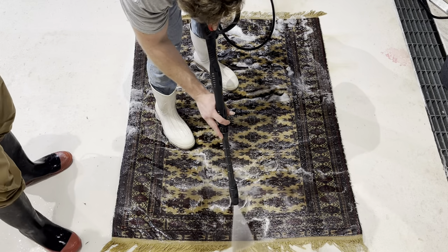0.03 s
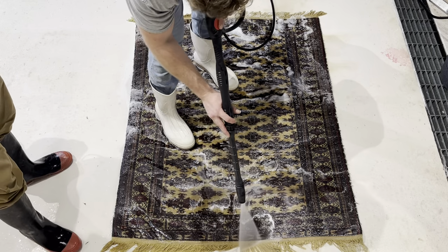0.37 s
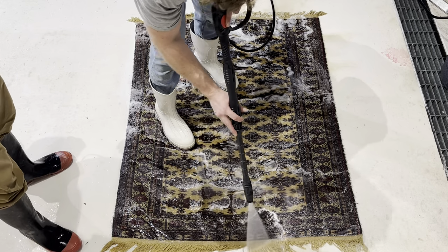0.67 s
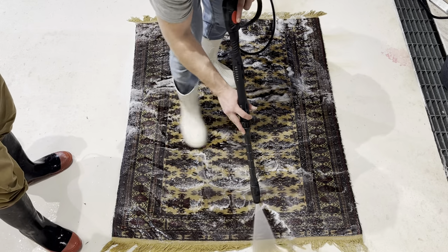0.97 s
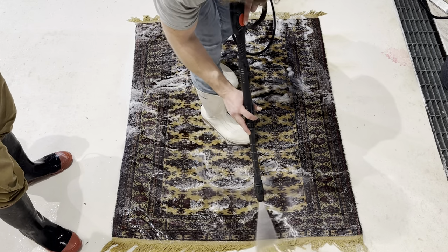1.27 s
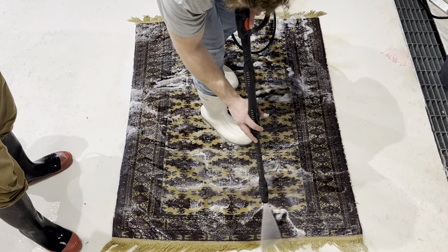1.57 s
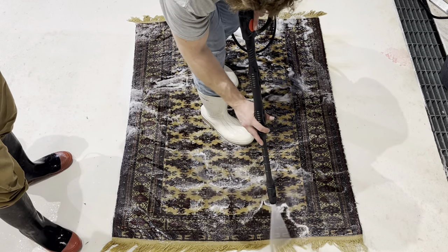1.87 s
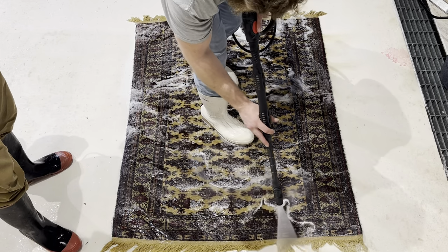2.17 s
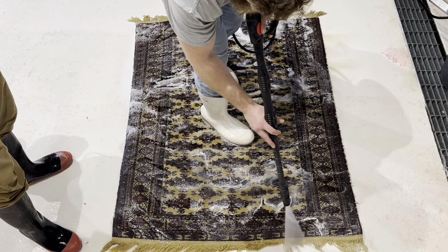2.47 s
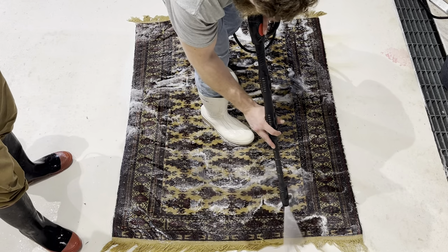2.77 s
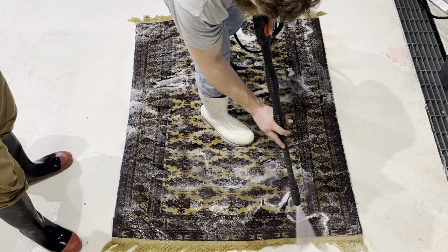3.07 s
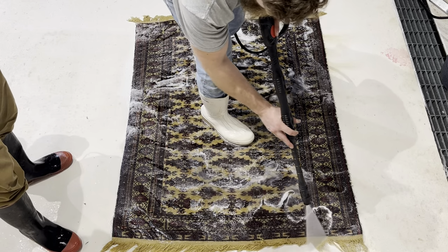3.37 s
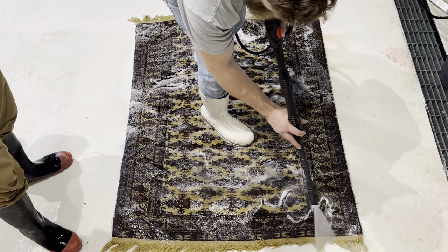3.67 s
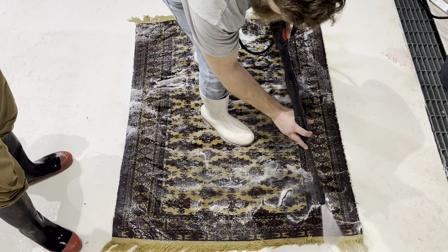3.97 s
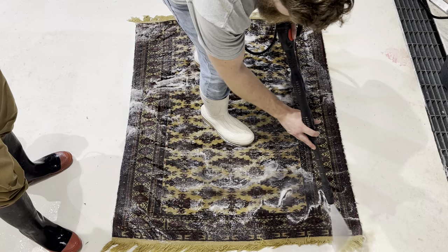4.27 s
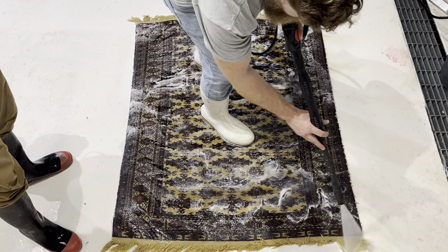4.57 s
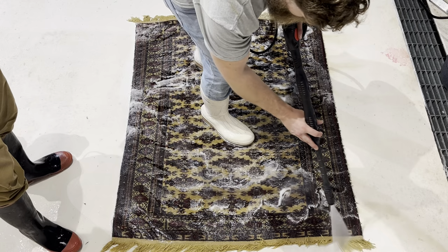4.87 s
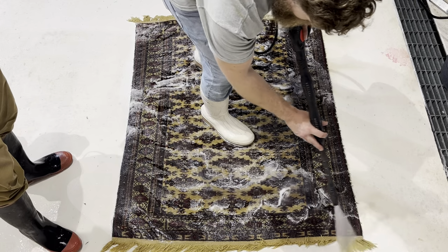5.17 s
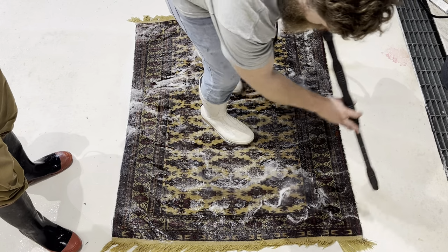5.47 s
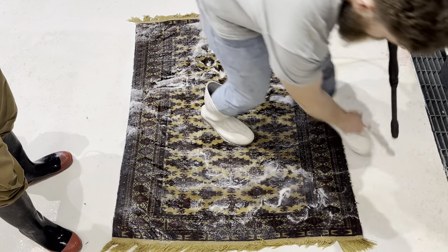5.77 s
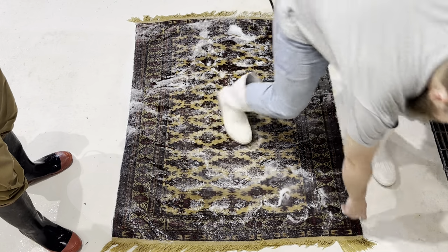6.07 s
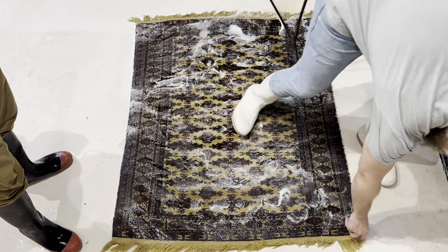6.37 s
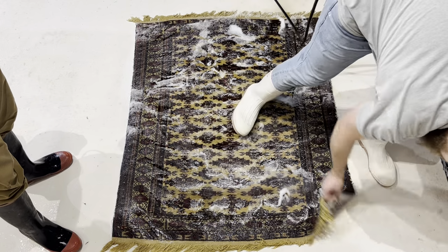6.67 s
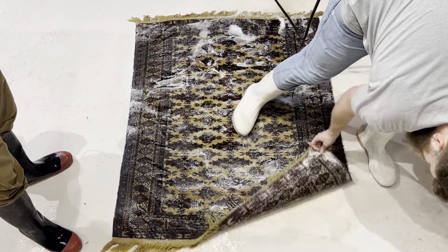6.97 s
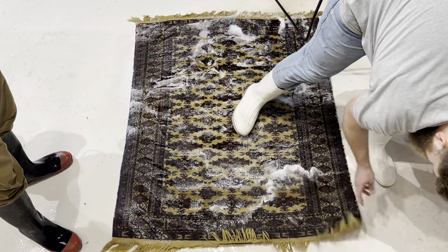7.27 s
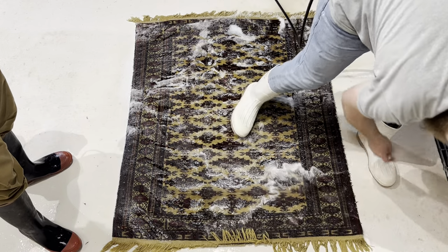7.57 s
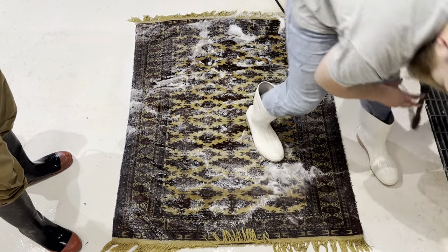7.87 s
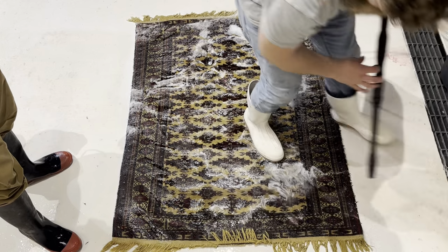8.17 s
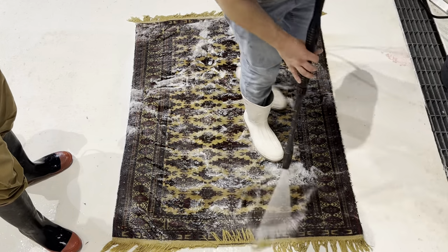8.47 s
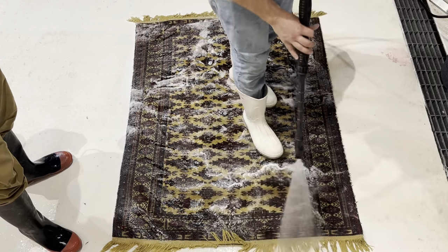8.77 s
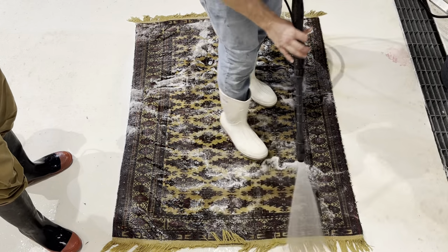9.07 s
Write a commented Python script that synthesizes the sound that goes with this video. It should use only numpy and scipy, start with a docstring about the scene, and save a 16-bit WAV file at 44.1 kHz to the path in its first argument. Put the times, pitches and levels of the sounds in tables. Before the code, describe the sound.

A pressure washer hisses on a wet rug, stops for boot thuds and a wet slap, then spits, squeals and sprays again.

```python
"""Pressure washer rinsing a soapy rug on a concrete workshop floor: droplets drum on the pile, the
water fan hisses, the piston pump drones and its valves rattle the housing. A rubber boot squeaks.
The trigger is let go, the gun snaps shut and the pump coasts down; boots thud, a corner of the wet
rug is peeled up and slaps back. On the next pull the lance spits, a valve squeals and the jet builds."""
import sys
import numpy as np
from scipy import signal
from scipy.fft import rfft, irfft, next_fast_len
from scipy.io import wavfile
from scipy.ndimage import map_coordinates

SR = 44100
rng = np.random.default_rng(int(sys.argv[2]) if len(sys.argv) > 2 else 0)


def wav_record(signal):
    """Record a signal, one row per channel, as 16-bit PCM in the file named by sys.argv[1]."""
    frames = np.transpose(np.atleast_2d(signal))
    bounded = np.clip(frames, -1, 1)
    # unit amplitude maps onto the largest positive 16-bit level
    quanta = np.round(bounded * 32767).astype(np.int16)
    wavfile.write(sys.argv[1], SR, quanta)


N = 406602
TIME = np.arange(N) / SR
FFT_SIZE = next_fast_len(N + SR)
BINS_HZ = np.maximum(np.fft.rfftfreq(FFT_SIZE, 1 / SR), 1)
RELEASE_S, PULL_S = 5.44, 8.311  # trigger
PRESSURE_RISE_S = 0.035

# pump housing resonances: f/Hz, width/Hz, level/dB
HOUSING_MODES = [(585, 24, 2), (740, 110, -6), (1120, 26, -4), (1245, 28, -3.5), (1430, 70, -8),
                 (1630, 50, 1.5), (1800, 120, -11), (2050, 60, -12), (2480, 110, -10), (2592, 48, -5.5),
                 (2700, 90, -15), (3760, 90, -14), (4130, 70, -15), (4700, 400, -20), (5770, 70, -23)]
# stereo port pair: f/Hz, coherence, L-R/dB, left lead/rad
STEREO_PORTS = [(100, .9, -1, .2), (300, .8, -2.5, -.3), (600, .5, -1.5, -1.2), (900, .3, -2, -1),
                (1550, .33, -2.5, -1.2), (1800, .82, 1.5, 0), (2300, .92, 1, .05), (3000, .78, .3, .2),
                (4600, .5, 4.3, .5), (5200, .25, 4, -.1), (5900, .43, 2.5, -1.5), (7100, .5, 0, -1.8),
                (8300, .92, 0, -3.14), (10000, .8, -.6, -4.7), (11100, .96, 0, -6.2), (12500, .99, 0, -6.3),
                (13800, .72, 0, -7.85), (15200, .99, 0, -9.4)]


def from_db(db):
    """Decibels to gain."""
    return 10 ** (np.asarray(db) / 20)


def unit_rms(x):
    """Scale to rms 1."""
    return x / np.sqrt(np.mean(x ** 2) + 1e-20)


def in_time(rows):
    """Table columns interpolated per sample."""
    times_s, *columns = np.transpose(rows)
    return [np.interp(TIME, times_s, c) for c in columns]


def in_frequency(rows):
    """Table columns interpolated per bin, on log f."""
    hz, *columns = np.transpose(rows)
    return [np.interp(np.log(BINS_HZ), np.log(hz), c) for c in columns]


def filtered(x, response):
    """Apply a frequency response."""
    return irfft(rfft(x, FFT_SIZE) * response, FFT_SIZE)[..., :N]


def coloured(x, spectrum):
    """Shape x by a spectrum table; rms 1."""
    return unit_rms(filtered(x, from_db(in_frequency(spectrum)[0])))


def resonated(x, hz, width_hz):
    """One resonance; rms 1."""
    return unit_rms(signal.lfilter(*signal.iirpeak(hz, hz / width_hz, fs=SR), x))


def white():
    """Two independent noises: the ports' shared and differing parts."""
    return rng.standard_normal((2, N))


def drift(knots_per_s):
    """Smooth random curve; rms 1."""
    knots = rng.standard_normal(4096)
    return unit_rms(map_coordinates(knots, [TIME * knots_per_s], order=2, mode="wrap"))


def drops(per_s, spread_db):
    """Random impacts of uneven size; rms 1."""
    sizes = from_db(spread_db * np.minimum(rng.exponential(1, N), 4))
    return unit_rms(white() * sizes * (rng.random(N) < per_s / SR))


def phase_of(hz):
    """Running phase/rad of a varying frequency."""
    return 2 * np.pi * np.cumsum(hz) / SR


def since(t_s):
    """Seconds after t_s; zero before."""
    return np.maximum(TIME - t_s, 0)


def blow(t_s, t60_s, rise_s):
    """Impact envelope: quick rise, exponential fall."""
    age_s = since(t_s)
    return (1 - np.exp(-age_s / rise_s)) * np.exp(-np.minimum(np.log(1000) * age_s / t60_s, 40))


def swell(middle_s, length_s):
    """Half-cosine envelope."""
    return np.cos(np.pi * np.clip((TIME - middle_s) / length_s, -.5, .5))


def build_up(delay_s, width_s):
    """S-curve, 0 to 1, after the pull."""
    return (TIME > PULL_S) * (1 + np.tanh((TIME - PULL_S - delay_s) / (2 * width_s))) / 2


def reflected(x):
    """Echoes off floor, body and ceiling comb the sound, swaying as lance and body move."""
    # delay/s, gain, sway/s
    echoes = [(.00082, .06, .00008), (.00122, -.1, .00012), (.0016, .1, .0001), (.0031, .11, .0002),
              (.0053, -.12, .0002), (.00815, .11, .00015), (.0088, -.11, .00012), (.01033, .12, .00005),
              (.01047, -.1, .00005), (.0131, -.11, .0002), (.0166, .12, .0002), (.0203, .11, .0002)]
    out, samples = x, np.arange(N)
    for delay_s, gain, sway_s in echoes:
        lag = np.round((delay_s + sway_s * drift(1.2)) * SR).astype(int)
        out = out + gain * x[:, np.maximum(samples - lag, 0)]
    return out


def sweep_db():
    """Hiss and mist levels as the lance sweeps."""
    # per burst: t/s, hiss/dB, mist/dB
    first_burst = [(0.1, -25.5, -31), (0.2, -25.5, -30.5), (1.0, -26, -32.5), (1.13, -27, -31),
                   (1.19, -25.5, -34), (1.42, -25.5, -31), (3.39, -26.5, -31.5), (4.17, -27.5, -29.5),
                   (5.3, -27.5, -32)]
    second_burst = [(8.6, -24, -27.5), (8.666, -23, -29.5), (9.2, -25, -30.5)]
    return in_time(np.vstack([first_burst, second_burst]))


def jet_level(spit_db, fall_db_per_s):
    """Steady, dying on release; on the pull the charged hose spits before pump pressure arrives."""
    spit_rise_s, spit_length_s = 0.011, 0.065
    first_burst = from_db(-fall_db_per_s * since(RELEASE_S))
    age_s = since(PULL_S)
    spit = from_db(spit_db) * (1 - np.exp(-age_s / spit_rise_s)) * np.exp(-(age_s / spit_length_s) ** 2)
    return first_burst + np.hypot(spit, build_up(delay_s=0.16, width_s=PRESSURE_RISE_S))


def jet():
    """Droplets drum on the pile, the unevenly breaking fan hisses, its mist adds the top."""
    # spectra: f/Hz, level/dB
    drumming_spectrum = [(25, -55), (45, -35), (70, -23), (150, -8.5), (280, -5.5), (400, -1.5),
                         (500, -2.5), (620, -2), (900, -2.5), (1250, -3), (1600, -3), (2000, -17.5),
                         (3000, -17.5)]
    hiss_spectrum = [(1100, -47.5), (1800, -1), (2600, 0), (3200, 1), (5200, 0), (6500, -0.5), (7500, -2.5),
                     (8500, -7.5), (10000, -5.5), (13000, -59)]
    mist_spectrum = [(7500, -6), (9500, 1.5), (11200, 5.5), (13000, 1.5), (14500, 1), (15700, -20.5)]
    # hiss top against its body along the sweep: t/s, level/dB
    brightness = [(.2, 1), (.9, -0.7), (1.25, 0.7), (1.85, -0.2), (2.45, -2), (3.45, -2), (4.2, 0.5),
                  (5.3, -0.6)]
    split_hz, dulling_db_per_s = 4500, 150
    hiss_db, mist_db = sweep_db()
    flutter = from_db(.2 * drift(25) + .25 * drift(150))
    nearer_db = 2.5 * (TIME > PULL_S)  # second burst lands closer
    drumming = from_db(-28 + nearer_db) * coloured(white(), drumming_spectrum)
    drumming *= jet_level(spit_db=-5.5, fall_db_per_s=117)
    hiss = from_db(hiss_db - 0.052) * coloured(white(), hiss_spectrum)
    hiss *= jet_level(spit_db=-7, fall_db_per_s=89)
    body = filtered(hiss, 1 / (1 + (BINS_HZ / split_hz) ** 2))
    collapse_db = dulling_db_per_s * since(RELEASE_S) * (TIME < PULL_S)
    hiss = body + (hiss - body) * from_db(in_time(brightness)[0] - collapse_db)
    mist = from_db(mist_db) * coloured(drops(per_s=33000, spread_db=1.5), mist_spectrum)
    mist *= jet_level(spit_db=-4.5, fall_db_per_s=380)
    return reflected(flutter * (drumming + hiss + mist + surges()))


def motor():
    """Speed (share of full) and load gain: coasts down on release, spins up on the pull."""
    cut_out_s, coast_s, unload_s, unload_db_per_s = RELEASE_S + .04, .6, RELEASE_S + .11, 170
    start_slip, spin_up_s, harder_db = .37, .16, 3.5
    coasting = np.exp(-since(cut_out_s) / coast_s)
    starting = 1 - start_slip * np.exp(-(since(PULL_S) / spin_up_s) ** 2)
    first_load = from_db(-unload_db_per_s * since(unload_s))
    second_load = from_db(harder_db) * build_up(delay_s=0.16, width_s=0.02)
    return np.where(TIME < PULL_S, coasting, starting), first_load + second_load


def pump():
    """Pistons beat at shaft orders over the motor's magnetic hum; off speed it shudders and growls."""
    # piston lines: shaft order, level/dB, L-R/dB
    orders = [(2, -62, -8), (3, -48.5, 1), (5, -57, 3), (6, -44, -6), (7, -44, -4), (8, -49, -6),
              (9, -39, -3), (10, -48, 5), (11, -50, -9), (12, -46, -2), (13, -49, -6), (14, -50, 4),
              (16, -51, -1), (20, -40, 0), (21, -40.5, 1), (22, -49, -1), (23, -44, 3), (25, -50, -6),
              (26, -48, -9), (30, -52, 5), (39, -52, -6), (43, -52, -6), (45, -49, 0), (63, -51, 0),
              (66, -52, 0), (82, -52, 0), (93, -48, 0), (95, -48, 0)]
    # magnetic hum: harmonic, level/dB
    hum_lines = [(1, -40.5), (2, -50), (3, -52), (5, -48)]
    # labouring motor: middle/s, length/s, level/dB
    growls = [(5.525, 0.12, -43), (8.437, 0.075, -39)]
    shaft_hz, hum_hz, shudder, judder_db = 28.02, 119.9, 0.302, 2.5
    inrush_s, inrush_db = 0.16, -43
    speed, load = motor()
    slip = 1 - speed
    turns = np.cumsum(shaft_hz * speed * (1 + 0.000454 * drift(4) + shudder * slip * drift(60))) / SR
    port_hz, _, _, port_lead_rad = np.transpose(STEREO_PORTS)
    side = np.array([[.5], [-.5]])
    pistons = np.zeros((2, N))
    for order, db, pan_db in orders:
        lead_rad = np.interp(order * shaft_hz, port_hz, port_lead_rad)
        phase = 2 * np.pi * (order * turns + rng.random()) + side * lead_rad
        slack_db = -1.9 * order * slip  # slow strokes are softer: high lines go first
        pistons += from_db(db - 1.5 + slack_db + 0.87 * drift(4.4) + side * pan_db) * np.sin(phase)
    hum_phase = 2 * np.pi * turns * hum_hz / shaft_hz
    hum = sum(from_db(db) * np.sin(harmonic * hum_phase + .3 * side) for harmonic, db in hum_lines)
    stroke_phase = 2 * np.pi * 3 * turns
    growl = sum(from_db(db) * swell(t_s, length_s) for t_s, length_s, db in growls)
    growl *= np.sin(stroke_phase) + from_db(-7.5) * np.sin(2 * stroke_phase)
    buzz_phase = 2 * np.pi * hum_hz * TIME  # starting current
    inrush = from_db(inrush_db) * np.sqrt(swell(PULL_S + inrush_s / 2, inrush_s))
    inrush *= np.sin(buzz_phase) + from_db(-5) * np.sin(2 * buzz_phase)
    judder = from_db(judder_db * np.minimum(10 * slip, 1) * drift(70))
    hum *= from_db(0.5 * drift(3.3))
    return np.sqrt(2) * judder * (load * (pistons + hum) + growl + inrush)


def valve_flow():
    """Flow gain: follows the hiss, bleeds on after release until the valves seat, returns on the pull."""
    follow, bleed_db_per_s, seat_s, seated_db_per_s = 0.82, 17, 6.3, 65
    hiss_db = sweep_db()[0]
    ebb_db = bleed_db_per_s * since(RELEASE_S) + seated_db_per_s * since(seat_s)
    first_burst = from_db(follow * (hiss_db - hiss_db.mean()) - ebb_db)
    return from_db(-40.5) * (first_burst + build_up(delay_s=0.12, width_s=PRESSURE_RISE_S))


def valves():
    """Water forced through the chattering valves rushes and rattles the housing."""
    # f/Hz, level/dB
    rush_spectrum = [(100, -25.5), (500, -5.5), (1200, 13), (2800, 6.5), (5000, 0), (8000, -19),
                     (15000, -37.5)]
    housing_top_hz, chatter_db = 6000, 0.8
    rush = from_db(-2.5) * coloured(white(), rush_spectrum)
    rattle = filtered(drops(per_s=2500, spread_db=0.5), 1 / (1 + (BINS_HZ / housing_top_hz) ** 4))
    for k, (hz, width_hz, db) in enumerate(HOUSING_MODES):
        rush += (-1) ** k * from_db(db - 5.5 + 1.2 * drift(28)) * resonated(rattle, hz, width_hz)
    chatter = from_db(chatter_db * drift(110))
    return reflected(valve_flow() * chatter * rush)


def room_rumble():
    """Low, nearly steady room noise."""
    # f/Hz, level/dB
    rumble_spectrum = [(25, -28.5), (60, -4.5), (110, -0.5), (165, -4), (195, -6), (218, 6), (245, -5.5),
                       (330, -10), (600, -10), (1400, -15), (2200, -27), (4500, -29), (8000, -37),
                       (15000, -43.5)]
    return from_db(-51.0 + 0.14 * drift(11.0)) * coloured(white(), rumble_spectrum)


def boot_squeaks():
    """Rubber sticks and slips on wet pile: wavering, sagging pitch with a weak octave."""
    # middle/s, length/s, f/Hz, level/dB
    squeaks = [(1.01, .15, 480, -34), (1.083, .085, 403, -30), (1.154, .036, 382, -20.5),
               (1.205, .072, 384, -34)]
    sag_hz_per_s = 120
    waver = 1 + .025 * drift(120)
    out = 0
    for t_s, length_s, hz, db in squeaks:
        phase = phase_of((hz - sag_hz_per_s * (TIME - t_s)) * waver)
        out += from_db(db) * swell(t_s, length_s) * (np.sin(phase) + from_db(-14.5) * np.sin(2 * phase))
    return np.sqrt(2) * out * [[1], [.4]]


def surges():
    """The fan digs into puddles and the rug's fringe: short midrange gushes."""
    # middle/s, length/s, f/Hz, level/dB
    gushes = [(1.26, 0.15, 1090, -34), (1.34, .16, 1760, -35), (2.06, .2, 1600, -34.5),
              (4.05, .5, 1000, -39), (4.66, 0.11, 990, -34), (4.85, 0.23, 1100, -36)]
    width_hz = 850
    spray = drops(per_s=9000, spread_db=0.5)
    out = 0
    for t_s, length_s, hz, db in gushes:
        band = resonated(resonated(spray, hz, width_hz), hz, width_hz)
        out += from_db(db) * swell(t_s, length_s) * band
    return out


def wet_rug():
    """Soaked pile tears off the floor, squelches and seeps; flung water lands as droplets."""
    # pile lifted by jet or hand, squeezed by landing or boots: t/s, level/dB, rise/s, t60/s
    peels = [(3.945, -24, .012, .15), (6.765, -55, .02, .3), (6.808, -45.5, .02, 0.24),
             (6.845, -48, .012, .22), (6.92, -56, .015, .25), (6.955, -50, .012, .12)]
    squelches = [(7.328, -34.5, 0.003, 0.14), (7.367, -36, .005, .1), (7.885, -50, .005, 0.23),
                 (7.936, -29.5, 0.025, 0.23), (8.028, -42, .005, 0.18)]
    # t/s, level/dB, t60/s
    splashes = [(6.028, -57, 0.22), (6.181, -48, 0.1), (6.876, -52, 0.023), (6.994, -52, .08),
                (7.031, -54, .06), (7.072, -48, .02), (7.331, -44.5, 0.34), (7.358, -33, 0.034),
                (7.379, -31, 0.04), (7.395, -33, 0.06), (7.405, -46, 0.21), (7.958, -48, .03),
                (8.03, -45, 0.13), (8.103, -55, 0.12), (8.157, -52, .04), (8.245, -57, 0.071),
                (8.317, -34.5, 0.22)]
    # spectra: f/Hz, level/dB
    peel_spectrum = [(300, -20), (900, -1.5), (1600, 8), (2600, -1), (4000, -5.5), (7000, -14),
                     (15000, -26)]
    squelch_spectrum = [(60, -30), (200, -9.5), (900, 3.5), (2000, 2.5), (3500, 0), (6000, -8), (9000, -28),
                        (15000, -21)]
    droplet_spectrum = [(500, 0), (2500, 1), (5500, 4), (8500, 1), (12000, -5), (15500, -9)]
    crackle = drops(per_s=2800, spread_db=2.5)
    tugs = sum(from_db(db) * blow(t_s, t60_s, rise_s) for t_s, db, rise_s, t60_s in peels)
    squeezes = sum(from_db(db) * blow(t_s, t60_s, rise_s) for t_s, db, rise_s, t60_s in squelches)
    seeping = from_db(-60.5) * swell(middle_s=7.8, length_s=0.88)
    tearing = from_db(-0.5) * tugs * coloured(crackle, peel_spectrum)
    squelching = from_db(-8.5) * (squeezes + seeping) * coloured(crackle, squelch_spectrum)
    showers = sum(from_db(db) * blow(t_s, t60_s, rise_s=0.0013) for t_s, db, t60_s in splashes)
    droplets = coloured(drops(per_s=5700, spread_db=-3.5), droplet_spectrum)
    return reflected(tearing + squelching + showers * droplets)


def gun():
    """The trigger valve shuts with a bright spit; the jolt rings briefly in the gun."""
    # f/Hz, level/dB
    spit_spectrum = [(500, -19), (3000, -6), (6000, -3.5), (11000, -3.5), (15700, -1.5)]
    # f/Hz, width/Hz, level/dB
    modes = [(1340, 260, -28.5), (2480, 370, -27.5), (4640, 400, -34)]
    snap_s = 5.483
    spit = from_db(-17) * blow(snap_s, t60_s=0.05, rise_s=0.00076) * coloured(white(), spit_spectrum)
    jolt = white()
    clack = sum(from_db(db) * resonated(jolt, hz, width_hz) for hz, width_hz, db in modes)
    return reflected(spit + blow(snap_s, t60_s=0.13, rise_s=0.002) * clack)


def thuds():
    """Boots, lance and rug hit the floor: the softer, the duller; each has a short hollow ring."""
    # t/s, level/dB, low-pass/Hz, ring/Hz, t60/s
    contacts = [(5.959, -39.5, 600, 259, 0.27), (6.082, -40.5, 1500, 950, 0.09),
                (6.181, -34.5, 3500, 1040, 0.18), (6.184, -43.5, 300, 200, .35), (6.36, -50, 400, 220, 0.2),
                (6.815, -54, 500, 330, 0.13), (6.858, -45, 400, 340, 0.063), (6.955, -50, 1000, 520, .14),
                (6.964, -49, 1800, 1550, .09), (7.38, -30.5, 3000, 690, 0.04),
                (7.395, -37, 1500, 710, 0.12), (7.645, -46, 300, 224, 0.4), (7.88, -49, 250, 170, 0.5),
                (8.015, -45, 700, 378, 0.32), (8.199, -43, 260, 214, 0.45)]
    # f/Hz, level/dB
    knock_spectrum = [(30, -8), (90, 0), (220, 2), (450, -3), (700, 3), (1200, -8), (2500, -14),
                      (6000, -14), (15000, -34)]
    ring_q = 5.5
    knock = coloured(white(), knock_spectrum)
    out = 0
    for t_s, db, lowpass_hz, ring_hz, t60_s in contacts:
        dull = unit_rms(signal.sosfilt(signal.butter(2, lowpass_hz, fs=SR, output="sos"), knock))
        hollow = resonated(knock, ring_hz, ring_hz / ring_q)
        out += from_db(db) * (0.61 * dull + 0.55 * hollow) * blow(t_s, t60_s, rise_s=0.00091)
    return out


def valve_squeal():
    """Returning pressure sets a valve hooting at the lowest housing mode, growing until it opens."""
    start_s, open_s, t60_s = 8.364, 8.456, 0.098
    throb_hz, throb_depth, roughness = 50, .2, .022
    hz = HOUSING_MODES[0][0]
    throb = 1 + throb_depth * np.sin(phase_of(throb_hz * (1 + .15 * drift(40))))
    tone = np.sqrt(2) * np.sin(phase_of(hz * (1 + roughness * drift(250)))) * [[1], [.4]]
    gush = from_db(-11) * resonated(white(), hz, width_hz=hz / 4)
    growth = np.sqrt(np.clip(since(start_s) / (open_s - start_s), 0, 1))
    hoot = from_db(-23.5 - 60 * since(open_s) / t60_s) * growth
    after_ring = from_db(-34) * swell(middle_s=8.525, length_s=0.097)
    return (hoot + after_ring) * throb * (tone + gush)


def workshop(x, wet_db):
    """Hard walls add a diffuse tail whose treble dies first."""
    split_hz, low_t60_s, high_t60_s, predelay_s = 4000, 0.65, 0.34, .006
    age_s = TIME[:SR]
    noise = rng.standard_normal((2, SR))
    low = signal.sosfilt(signal.butter(2, split_hz, fs=SR, output="sos"), noise)
    tail = low * from_db(-60 * age_s / low_t60_s) + 2 * (noise - low) * from_db(-60 * age_s / high_t60_s)
    tail *= age_s > predelay_s
    tail /= np.sqrt(np.sum(tail ** 2, axis=1, keepdims=True))
    return x + from_db(wet_db) * filtered(x, rfft(tail, FFT_SIZE))


def ports(x, pan_scale):
    """Shared and differing parts to left and right; coherence, level and phase vary with frequency."""
    coherence, pan_db, lead_rad = in_frequency(STEREO_PORTS)
    shared, differing = rfft(x, FFT_SIZE)
    sign = np.array([[1], [-1]])
    pair = np.sqrt((1 + coherence) / 2) * shared + sign * np.sqrt((1 - coherence) / 2) * differing
    placement = from_db(sign * pan_scale * pan_db / 2) * np.exp(.5j * sign * lead_rad)
    return irfft(pair * placement, FFT_SIZE)[:, :N]


def scene():
    """Washer, reverberant handling noises and room rumble, in stereo."""
    squeaks = workshop(boot_squeaks(), wet_db=-7.5)
    handling = workshop(wet_rug() + thuds(), wet_db=-6.0)
    rumble = room_rumble()
    washing = jet() + valves() + gun() + squeaks + valve_squeal() + handling
    return ports(washing, pan_scale=1) + ports(rumble, pan_scale=.15) + pump()


def record(dry):
    """Roll off the deepest rumble; cut the top steeply."""
    highpass_hz, lowpass_hz = 36, 15700
    thinned = signal.sosfilt(signal.butter(2, highpass_hz, "high", fs=SR, output="sos"), dry)
    return filtered(thinned, 1 / np.sqrt(1 + (BINS_HZ / lowpass_hz) ** 600))


dry = scene()
out = record(dry)
wav_record(out)
```